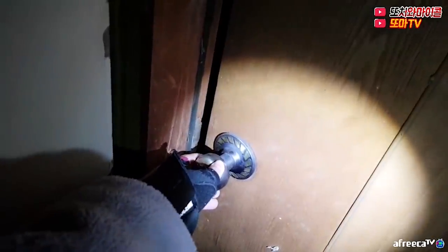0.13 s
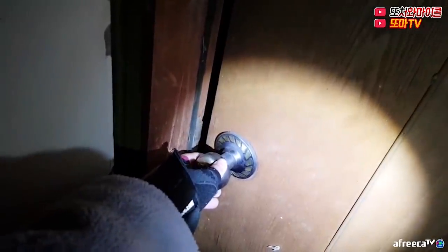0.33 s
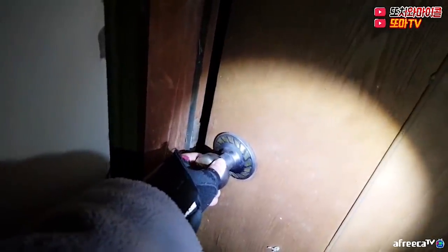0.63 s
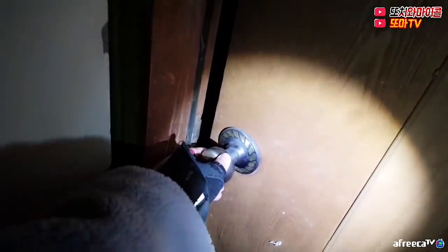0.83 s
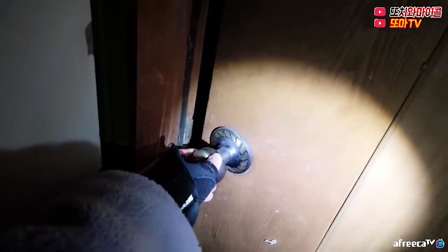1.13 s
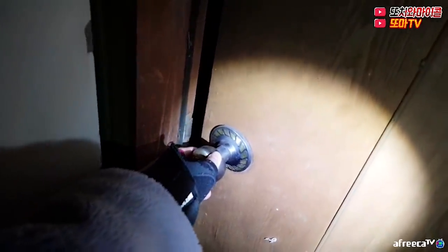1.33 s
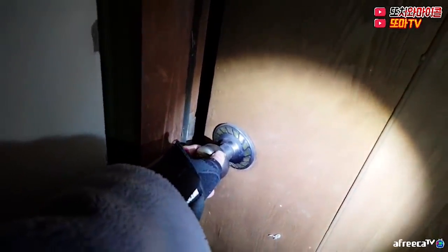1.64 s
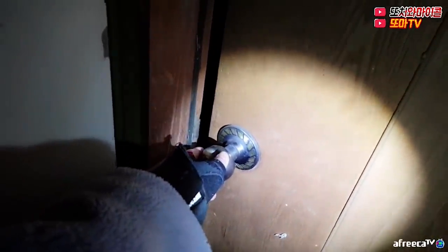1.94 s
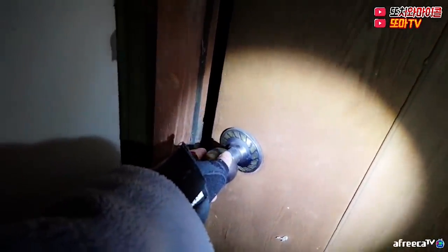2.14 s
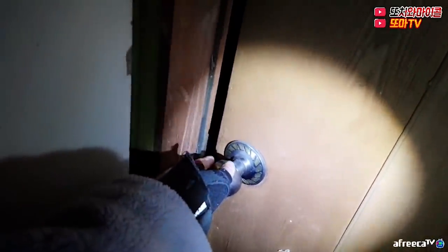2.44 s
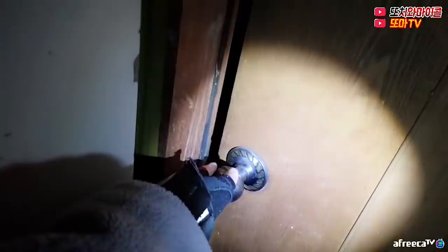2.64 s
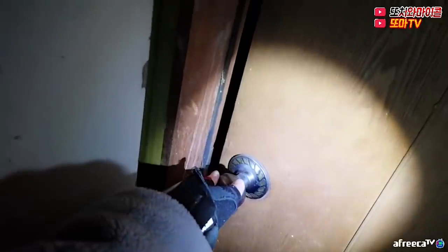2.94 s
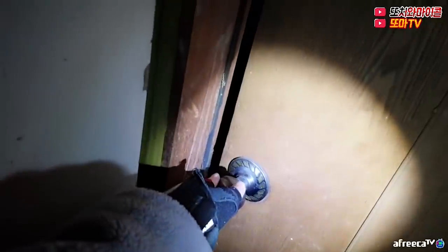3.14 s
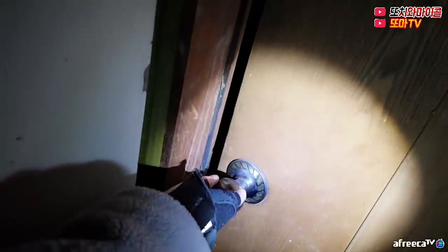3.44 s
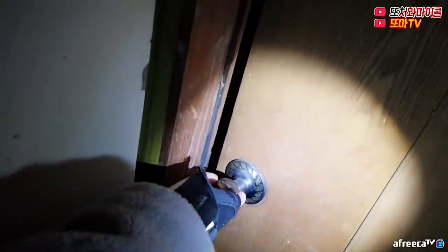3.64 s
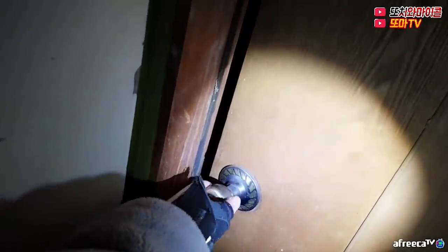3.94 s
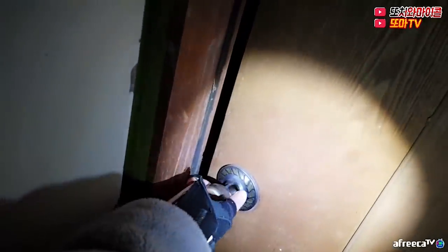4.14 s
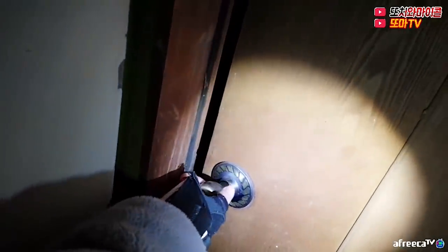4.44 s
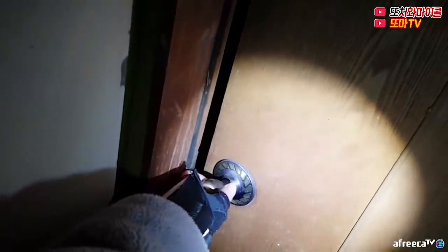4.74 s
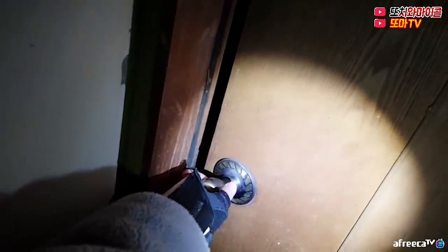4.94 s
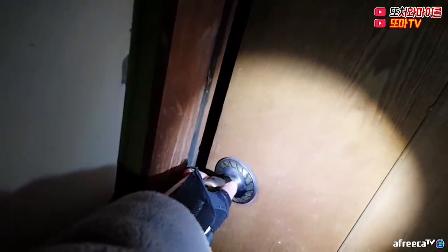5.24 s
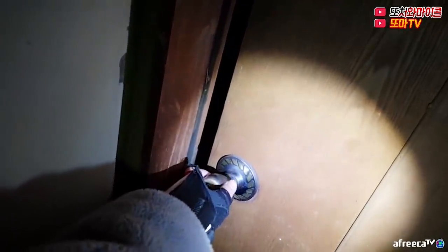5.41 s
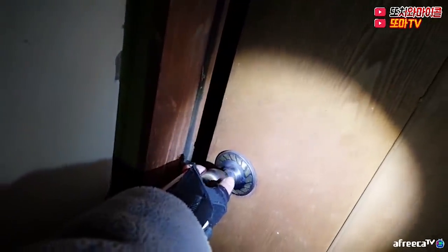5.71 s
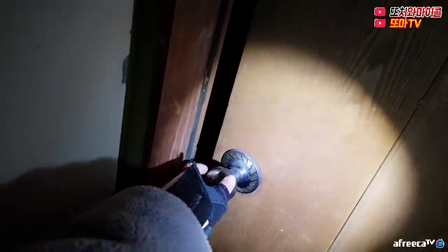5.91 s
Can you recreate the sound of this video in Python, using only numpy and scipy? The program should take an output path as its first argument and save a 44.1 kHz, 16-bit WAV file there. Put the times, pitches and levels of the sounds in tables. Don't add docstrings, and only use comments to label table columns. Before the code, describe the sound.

A gloved hand shakes a loose metal doorknob; sharp latch clacks and deep door thuds burst early, then sparse clicks and faint rubbing.

```python
import sys
import numpy as np
from scipy import signal
from scipy.fft import rfft, irfft, next_fast_len
from scipy.io import wavfile

SR = 44100
rng = np.random.default_rng(int(sys.argv[2]) if len(sys.argv) > 2 else 0)


def how_loud(loudness_db):
    steps = np.asarray(loudness_db, float) / 20
    return 10 ** steps


def materialize(psi):
    bounded = np.clip(np.atleast_2d(psi).T, -1, 1)
    quanta = np.round(bounded * 32767).astype(np.int16)
    wavfile.write(sys.argv[1], SR, quanta)


N = 267586

# (f/Hz, width/Hz, level/dB)
KNOB_BODY = [(529, 600, -19), (838, 42, 5), (1231.5, 18, -8), (1557, 21, 1), (1710, 170, -8.5),
             (2050, 26, -4), (2291, 46, -11), (3012, 73, 8), (3590, 300, -4.5), (3813, 146, 8.5),
             (4140, 850, -4.5), (4680, 116, -3.5), (5750, 170, -1), (7040, 630, 6.5)]
# (f/Hz, level/dB, t60/s)
DOOR_MODES = [(95.4, -4.5, 0.27), (132, 0.5, 0.15), (159.3, 2, 0.35), (204.6, 2, 0.074),
              (241.8, -9.5, 0.66), (272.3, 2, 0.087), (335, -2.5, 0.46), (354, 11, 0.029),
              (428.6, -2, 0.64), (453, -6, 0.52), (513, -21, 0.13)]


def rms_one(x):
    return x / np.sqrt(np.mean(x ** 2) + 1e-20)


def at_hz(points, hz):
    f, value = np.array(points)[:, :2].T
    return np.interp(np.log(hz), np.log(f), value)


def band(x, low_hz, high_hz):
    return signal.sosfilt(signal.butter(2, [low_hz, high_hz], "band", fs=SR, output="sos"), x)


def ring(x, hz, t60):
    r, w = how_loud(-60 / (t60 * SR)), 2 * np.pi * hz / SR
    return signal.lfilter([0, np.sin(w)], [1, -2 * r * np.cos(w), r * r], x + 1e-18)


def resonance(x, hz, width):
    r, w = np.exp(-np.pi * width / SR), 2 * np.pi * hz / SR
    return signal.lfilter([(1 - r * r) / 2, 0, (r * r - 1) / 2], [1, -2 * r * np.cos(w), r * r], x)


def through(x, peaks):
    return sum(how_loud(db) * resonance(x, hz, width) * (-1) ** k for k, (hz, width, db) in enumerate(peaks))


def chatter(t, t60, noise, rise):
    bounces = np.sign(noise) * np.abs(noise) ** 1.77
    return bounces * (1 - np.exp(-t / rise)) * how_loud(-60 * t / np.clip(t60, 0.004, 0.4))


def grains(per_s, spread_db):
    sizes = how_loud(spread_db * np.minimum(rng.exponential(1, N), 4)) * rng.choice([-1, 1], N)
    return sizes * (rng.random(N) < per_s / SR)


def swells(rows, rise_db_per_s, fall_db_per_s, rest_db, column):
    t, level = np.arange(0, N + 64, 64) / SR, rest_db
    for row in rows:
        start, end = row[0], row[0] + row[1]
        rise = rise_db_per_s * np.maximum(start - t, 0)
        fall = fall_db_per_s * np.maximum(t - end, 0)
        level = np.maximum(level, row[column] - rise - fall)
    return np.interp(np.arange(N) / SR, t, level)


def add(out, s, sound):
    at = int(s * SR)
    out[at:at + len(sound)] += sound[:N - at]


def floor():
    # (f/Hz, level/dB)
    spectrum = [(15, -42), (25, -10.5), (55, 2), (72, -2.5), (114, -13), (147, -11.5), (269, -34.5),
                (329, -50.5), (393, -33), (435, -63.5), (860, -50), (2300, -48.5), (5720, -32),
                (10500, -38), (13600, -74), (22000, -120)]
    hz = np.maximum(np.fft.rfftfreq(N, 1 / SR), 1)
    shaped = irfft(rfft(rng.standard_normal(N)) * how_loud(at_hz(spectrum, hz)), N)
    return how_loud(-57.5) * rms_one(shaped)


def leaf():
    # (t/s, hold/s, shudder level/dB, groan level/dB)
    jolts = [(0.0, 0.028, -51, -67.5), (0.2, 0.086, -51, -73), (0.5, 0.0174, -50, -72),
             (0.59, 0.011, -49.5, -33.5), (0.64, 0.015, -28, -31), (0.73, 0.0087, -40, -29),
             (0.79, 0.088, -25, -42.5), (0.94, 0.015, -24.5, -41.5), (1.06, 0.02, -36.5, -61.5),
             (1.14, 0.11, -47, -61), (1.3, 0.33, -49.5, -63.5), (1.77, 0.049, -43.5, -40.5),
             (1.92, 0.032, -47.5, -61), (2.25, 0.02, -49, -70), (2.47, 0.073, -53, -63),
             (2.9, 0.025, -51, -70), (3.08, 0.0137, -48.5, -68), (3.19, 0.016, -46.5, -76),
             (3.38, 0.0105, -58, -57), (3.58, 0.023, -41, -63), (3.64, 0.104, -45, -81.5),
             (3.95, 0.025, -52, -64.5), (4.15, 0.051, -51.5, -68), (4.68, 0.25, -52, -70),
             (5.16, .12, -46.5, -51), (5.34, 0.0085, -41, -50.5), (5.54, 0.005, -44, -55),
             (5.74, 0.014, -41.5, -49), (6.0, 0.0082, -43, -63)]
    # (f/Hz, width/Hz, level/dB)
    rock_modes = [(40.12, 7.9, 0.5), (52.7, 16.9, -2)]
    shudder_db = swells(jolts, 408, 180, rest_db=-59.5, column=2)
    groan_db = swells(jolts, 408, 126.5, rest_db=-72, column=3)
    rock_noise, groan_noise = rng.standard_normal((2, N))
    rock = 0
    for hz, width, db in rock_modes:
        rock = rock + how_loud(db) * rms_one(resonance(resonance(rock_noise, hz, width), hz, width))
    envelope = np.abs(signal.hilbert(rock, next_fast_len(N))[:N])
    rock = rock / (envelope + 0.14) ** 0.4
    groan = sum(how_loud(db) * ring(groan_noise, hz, 0.049) for hz, db, _ in DOOR_MODES[:6])
    return how_loud(shudder_db) * rms_one(rock) + how_loud(groan_db) * rms_one(groan)


def rub():
    # (t/s, hold/s, dull level/dB, bright level/dB)
    strokes = [(0.36, 0.21, -73, -72), (0.56, .05, -65, -76), (0.83, 0.024, -60.5, -64.5),
               (1.0, 0.16, -69, -68.5), (1.4, 0.261, -70.5, -68.5), (1.8, 0.107, -67, -65.5),
               (1.95, 0.28, -65.5, -67), (2.45, 0.25, -75.5, -68.5), (3.42, 0.34, -73, -68.5),
               (3.75, 0.024, -70, -64.5), (3.87, 0.34, -70, -66.5), (5.15, 0.049, -66, -65.5),
               (5.27, 0.1, -64.5, -61.5), (5.45, 0.14, -70, -67.5), (5.78, 0.087, -73.5, -64),
               (5.99, .08, -75.5, -63.5)]
    # (f/Hz, width/Hz, level/dB)
    rub_peaks = [(438, 320, 2), (900, 360, 4.5), (1342, 370, 3.5), (2550, 1700, 0.5), (4270, 1704, 7.5),
                 (5294, 2800, 8), (7540, 5300, 3)]
    dull_db = swells(strokes, 125, 53, rest_db=-78, column=2)
    bright_db = swells(strokes, 125, 53, rest_db=-73, column=3)
    friction = grains(1500, spread_db=2.0) + 0.249 * rng.standard_normal(N)
    peaks = []
    for k, (hz, width, db) in enumerate(rub_peaks):
        peaks.append(how_loud(db) * rms_one(resonance(friction, hz, width)) * (-1) ** k)
    dull, bright = sum(peaks[:3]), band(sum(peaks[3:]), 1870, 9000)
    return how_loud(dull_db) * rms_one(dull) + how_loud(bright_db) * rms_one(bright)


def scuffs():
    # (t of the top/s, level/dB, centre f/Hz, half length/s)
    strokes_on_wood = [(0.37, -68.5, 560, 0.041), (1.571, -65, 850, 0.043), (1.98, -52.5, 920, 0.0042),
                       (3.378, -65, 1200, 0.015), (2.613, -61.5, 880, 0.03), (5.752, -58.5, 770, 0.029),
                       (5.826, -72, 3060, 0.0195), (6.047, -60.5, 7200, 0.012), (2.3, -66, 5500, .004),
                       (1.737, -65, 6600, .005), (5.345, -66, 2800, .004), (6.1, -66, 3300, .012),
                       (5.67, -68, 4200, 0.023), (0.536, -64, 4400, .004)]
    t, friction = np.arange(N) / SR, grains(4000, spread_db=-0.5)
    out = np.zeros(N)
    for s, db, hz, half in strokes_on_wood:
        swell = np.exp(-((t - s) / half) ** 2)
        out += how_loud(db) * swell * rms_one(band(friction, hz / 1.335, hz * 1.31))
    return out


def door():
    # (t/s, panel peak level/dB, deep level/dB, rail level/dB, ring as share of full t60)
    thuds = [(0.559, -28, -28.5, -33.5, 0.2), (0.591, -26.5, -20.5, -32.5, 0.63),
             (0.628, -19, -24, -34, 0.56), (0.701, -19.5, -42, -24, 0.55), (0.8, -33, -44, -35.5, 0.46),
             (0.957, -36, -22.5, -39, 0.42), (0.973, -32, -36, -39, 0.34), (1.361, -36.5, -44, -44.5, 0.47),
             (1.7548, -22.5, -31.5, -37, 0.51), (2.138, -63, -54, -47.5, 0.256), (2.52, -49, -59.5, -57, 1),
             (3.338, -44, -57, -61.5, 0.58), (3.518, -50, -42.5, -84, 0.93), (3.54, -47.5, -41, -70, 0.97),
             (3.824, -47, -52, -58.5, 1), (4.454, -43.5, -50, -54, 0.25), (5.198, -43.5, -51, -64, 0.62),
             (5.26, -67, -63, -53, 1), (5.75, -63.5, -45, -53.5, 0.44)]
    out, t = np.zeros(N), np.arange(SR // 2) / SR
    push = t * np.exp(-t / 0.0004)
    push = push / push.sum()
    for s, panel_db, deep_db, rail_db, share in thuds:
        levels = [deep_db + 0.5] * 2 + [panel_db - 7.0] * 5 + [rail_db] * 4
        for k, ((hz, mode_db, t60), blow_db) in enumerate(zip(DOOR_MODES, levels)):
            luck_db = 2.0 * rng.normal()
            mode = ring(push, hz, t60 * share)
            add(out, s, how_loud(blow_db + mode_db + luck_db) * (-1) ** k * mode)
    return out


def clicks():
    # (t/s, latch peak level/dB, wood over latch level/dB, chatter t60/s, hardness/dB)
    slams = [(0.5898, -17.5, -5, 0.018, 0), (0.5964, -30.5, 2, 0.018, 4), (0.6563, -27, -2.5, 0.027, 0),
             (0.8804, -46, -0.5, 0.067, -11), (4.6547, -63.5, 5.5, 0.08, -13),
             (5.1674, -43, -2.5, 0.022, -6), (5.4248, -50.5, -5, 0.03, -1)]
    latches = [(0.5612, -37.5, -5, 0.025, 7), (0.7008, -26.5, 0.5, 0.048, 13.5),
               (0.7514, -35.5, -5.5, 0.053, -0.5), (0.7934, -32.5, -2, 0.052, 2),
               (1.3744, -37.5, -2, 0.045, -7), (1.749, -40, 2.5, 0.09, 0.5),
               (2.522, -35.5, -9.5, 0.049, 0.5)]
    knocks = [(0.7108, -31, -12, 0.021, -10), (0.9556, -22.5, -6, 0.036, 3),
              (0.9716, -21, -9.5, 0.029, 2.5), (1.3602, -27.5, -13.5, 0.044, -6),
              (1.7644, -37.5, 6, 0.014, 7), (1.975, -50.5, -27, 0.034, 8.5), (4.453, -45.5, -1.5, 0.062, 3),
              (5.1993, -28.5, -9, 0.031, -5), (5.2408, -41.5, -1, 0.046, -4)]
    ticks = [(1.3004, -57.5, -4.5, 0.081, 1), (2.6756, -47.5, -13, 0.041, -9),
             (2.848, -52.5, -30, 0.094, -7.33), (3.1057, -52.5, -11, 0.088, -4),
             (3.3694, -49.5, -8, 0.022, -4), (3.825, -53, -12, 0.071, -14), (4.004, -59, -20, 0.085, -6),
             (4.1955, -62, -7, 0.069, -3), (5.41, -51, -3.5, 0.032, -10)]
    # (metal over latch level/dB, bright over latch level/dB)
    kinds = [
        (-2.5, -11.5),
        (-6.5, -42),
        (-20.5, -26.5),
        (3, 0),
    ]
    # (t/s, latch level/dB, wood level/dB, metal level/dB, bright level/dB, t60/s)
    finger_tick = (6.0025, -60, -63.5, -44, -41.5, 0.04)
    # (low f/Hz, high f/Hz, crest level/dB, t60 factor)
    parts = [
        (432, 1097, -0.5, 3.1),
        (1240, 3240, -0.5, 0.95),
        (2816, 4940, 4, 0.78),
        (5100, 10280, 4, 1.15),
    ]

    contacts = [finger_tick]
    for rows, (metal, bright) in zip((slams, latches, knocks, ticks), kinds):
        for s, db, wood, t60, hard in rows:
            contacts.append((s, db, db + wood, db + metal + 0.4 * hard, db + bright + hard, t60))
    out, t = np.zeros(N), np.arange(SR // 6) / SR
    for s, latch_db, wood_db, metal_db, bright_db, t60 in contacts:
        noise = rng.standard_normal(len(t))
        snap = how_loud(-2.5) * chatter(t, 0.0032, noise, rise=0.000222)
        for db, (low_hz, high_hz, crest_db, factor) in zip((wood_db, latch_db, metal_db, bright_db), parts):
            burst = chatter(t, t60 * factor, noise, rise=0.00085) + snap
            body = burst + how_loud(3.5) * through(burst, KNOB_BODY)
            part = band(band(body, low_hz, high_hz), low_hz * 0.8, high_hz * 1.3)
            add(out, s, how_loud(db + crest_db) * part / np.abs(part).max())
    return out


def spots():
    # (t/s, peak level/dB, f/Hz, width/Hz, t60/s)
    struck = [(.5615, -35, 3600, 900, 0.039), (.5905, -20.5, 3600, 1200, .015),
              (.5905, -26.5, 8000, 2500, 0.011), (.6575, -29.5, 6300, 1500, .025),
              (0.7014, -24.5, 3240, 900, 0.043), (.794, -43, 5230, 900, 0.036),
              (.9575, -26.5, 1750, 400, 0.033), (.9575, -36, 5700, 900, 0.023),
              (.9745, -27.5, 2090, 600, 0.033), (.975, -38, 8500, 2000, 0.023),
              (1.3765, -36, 2600, 1500, .015), (1.424, -56, 1410, 200, .03), (2.677, -48, 5500, 900, .025),
              (3.106, -47.5, 5470, 1000, .025), (3.37, -49, 5840, 900, 0.028),
              (3.8255, -56, 2500, 2500, 0.012), (5.2418, -37.5, 2400, 2000, .012),
              (6.0035, -38, 3000, 1400, 0.015), (6.0023, -35, 5000, 1800, .014),
              (6.003, -35, 8200, 3000, .014), (6.0095, -47, 6000, 4000, .012), (.61, -40, 1850, 500, .1),
              (.636, -33, 1880, 300, 0.087), (.962, -33, 3050, 200, .04), (.983, -33, 1550, 300, 0.055),
              (0.7983, -39, 2900, 1500, .04), (1.012, -42, 1900, 1210, .07), (1.036, -41, 900, 900, .06),
              (.563, -43, 1300, 500, .03), (5.1672, -42, 1700, 1400, .015), (5.2002, -34.5, 1700, 300, .03),
              (5.2418, -45, 3300, 1500, .012), (1.3604, -36, 1760, 300, .03), (1.365, -40, 3050, 300, .03),
              (1.3765, -42, 4200, 900, .012), (1.976, -49, 1250, 597, .02), (3.371, -50, 4400, 700, .03),
              (3.372, -58, 1400, 700, .03), (2.849, -49, 4630, 900, .05)]
    # (t/s, peak level/dB, f/Hz, width/Hz, t60/s)
    further_spots = [(1.256, -61, 1580, 250, .04), (.592, -30, 630, 300, .06), (.976, -35, 580, 250, .06),
                     (.6357, -32, 2500, 3000, .012), (.7509, -41, 3000, 3000, .012), (.615, -36, 2400, 2500, .01),
                     (.718, -38, 3000, 1500, .012), (2.5215, -46, 4180, 250, .035),
                     (5.2415, -39.5, 2900, 2200, 0.0092), (3.825, -58, 1800, 2500, .012),
                     (2.86, -58, 4460, 500, 0.11), (3.8, -55, 4300, 900, .1), (.8, -42, 1040, 900, 0.089),
                     (.885, -48, 1200, 900, .08), (1.385, -47, 843, 120, 0.09), (1.05, -53.5, 3060, 150, .15)]
    out, t = np.zeros(N), np.arange(SR // 20) / SR
    for s, db, hz, width, t60 in struck + further_spots:
        burst = chatter(t, t60, rng.standard_normal(len(t)), rise=0.00036)
        burst = resonance(resonance(burst, hz, width), hz, width)
        add(out, s, how_loud(db) * burst / np.abs(burst).max())
    return out


def snaps():
    # (t/s, peak level/dB, lowest radiated f/Hz)
    impulses = [(0.591, -21, 2480), (0.6572, -32, 2500), (0.702, -30, 1500), (0.7031, -34, 1101),
                (0.9572, -36, 1500), (1.377, -39, 800), (5.242, -43, 900), (6.0035, -29.5, 2594)]
    out = np.zeros(N)
    for s, db, low_hz in impulses:
        click = np.arange(400) == 0
        pulse = band(band(click, low_hz, low_hz * 4), low_hz * 0.85, 12000)
        add(out, s, -how_loud(db) * pulse / np.abs(pulse).max())
    return out


def knob():
    # (t/s, shell level/dB, case level/dB, plate level/dB, ring as share of full t60)
    pings = [(0.592, -60, -34, -46, 0.37), (.636, -60, -38.5, -37, 0.49), (0.701, -60, -44, -50, 0.4),
             (0.9572, -49, -37, -37, 0.36), (0.974, -62, -35, -31, 0.6), (1.004, -55.5, -57, -51, 1.8),
             (1.361, -54, -37, -44, 0.28), (1.3756, -61, -58, -48, 1.3), (1.3765, -70, -44, -40, .4),
             (2.5215, -53, -48, -52, 0.33), (2.611, -70, -59, -53, 0.55), (2.85, -69, -72, -75, .3),
             (3.37, -64, -70, -70, 0.29), (5.2002, -44.5, -46, -59, 0.45), (5.243, -70, -54, -51, .35)]
    # (f/Hz, level/dB, t60/s)
    shell_modes = [(4181, 0, .5), (4150, -13, .3), (4223, -9, .35), (4081, -12, .2), (4325, -12, .15)]
    case_modes = [(1500, -1, 0.11), (1700, 0, 0.068), (1880, -4.5, 0.11), (2200, -3.5, .09),
                  (2470, -6, 0.081), (3060, -3, 0.094), (3600, -7, 0.049)]
    plate_modes = [(624.4, -10, 0.19), (839, 0, 0.17), (1050, -6, 0.12), (1171, -11, .1)]
    grips = [0.7, 0.9, 1.088, 1.47, 2.565, 2.87, 3.385, 5.246, 6.0]
    out, t = np.zeros(N), np.arange(SR // 2) / SR
    for s, shell_db, case_db, plate_db, share in pings:
        modes = np.zeros(len(t))
        for db, body in ((shell_db, shell_modes), (case_db, case_modes), (plate_db, plate_modes)):
            for hz, mode_db, t60 in body:
                modes += how_loud(db + mode_db - 60 * t / (t60 * share)) * np.sin(2 * np.pi * hz * t)
        grip = min(g for g in grips if g > s)
        held = how_loud(-8 * np.clip((t + s - grip) / 0.025, 0, 1))
        onset = 1 - np.exp(-t / 0.00094)
        add(out, s, onset * held * modes)
    return out


def rattle():
    # (t/s, hold/s, dull level/dB, bright level/dB)
    bouts = [(.6, .01, -65, -73), (.632, 0.022, -41, -45), (.66, 0.0034, -43, -42), (.68, .01, -53, -53),
             (.72, 0.016, -48.5, -59), (.77, .01, -53.5, -72), (.81, .005, -55.5, -71), (.9, .01, -66, -72)]
    dull_db = swells(bouts, 703, 347, rest_db=-120, column=2)
    bright_db = swells(bouts, 703, 347, rest_db=-120, column=3)
    hits = grains(2000, spread_db=3.0)
    body = hits + how_loud(3) * through(hits, KNOB_BODY)
    dull, bright = band(body, 410, 3130), band(body, 2000, 7500)
    return how_loud(dull_db) * rms_one(dull) + how_loud(bright_db) * rms_one(bright)


def kicks():
    # (t/s, level/dB, f/Hz, t60/s)
    bumps = [(3.516, -35, 47, 0.3), (3.538, -32, 47, .25), (3.532, -40.5, 205, 0.23),
             (5.69, -46.5, 160, 0.16), (1.097, -36, 41.5, 0.9), (1.029, -28.5, 42.5, 0.56),
             (.982, -20, 45, .25), (.624, -16.5, 58, .12), (.643, -13, 40, 0.26), (3.545, -40, 180, 0.22),
             (1.192, -36, 43, 0.47), (.96, -34, 436, .16), (.707, -20, 287, 0.072), (2.1, -44, 150, 0.09),
             (1.772, -22.5, 293, 0.072), (1.794, -35, 167, .3)]
    out, t = np.zeros(N), np.arange(SR // 2) / SR
    for s, db, hz, t60 in bumps:
        onset = 1 - np.exp(-t / 0.005)
        add(out, s, -how_loud(db - 60 * t / t60) * onset * np.sin(2 * np.pi * hz * t))
    return out


def spring():
    # (t/s, peak level/dB, coil over body level/dB)
    turn_slips = [(2.072, -54.5, -2), (2.083, -57, -6), (2.094, -55, -6), (2.103, -51, -10),
                  (2.122, -54, -8), (2.137, -49.5, -10), (2.1616, -52.5, -2), (2.178, -51.5, -1),
                  (2.194, -51, 0.1), (2.213, -50, -2)]
    # (t/s, peak level/dB, coil over body level/dB)
    return_slips = [(2.4763, -52, 8), (2.4955, -52.5, 5), (2.512, -50, -1), (2.534, -53, 2),
                    (2.551, -52, 7), (2.5708, -52, 5), (2.5887, -49.5, 3), (2.609, -47.5, -1)]
    # (f/Hz, width/Hz, level/dB)
    spring_body = [(1360, 170, 4.5), (2461, 270, 2.5), (3520, 1100, -2.5), (4200, 380, 0), (5140, 710, -3),
                   (6120, 1800, -6.5), (7500, 810, -12.5)]
    out, t = np.zeros(N), np.arange(SR // 20) / SR
    for s, db, coil_db in turn_slips + return_slips:
        slip = how_loud(db + 8.0) * chatter(t, 0.028, rng.standard_normal(len(t)), rise=0.00093)
        coil = resonance(slip, 5400, 410)
        add(out, s, through(slip, spring_body) + how_loud(coil_db) * coil)
    return out


def room(x):
    # (f/Hz, t60/s)
    reverb_times = [(150, 0.76), (500, 0.35), (1500, 0.44), (4000, 0.2), (9000, 0.1)]
    t = np.arange(SR // 2) / SR
    tail = np.zeros(len(t))
    for hz in 80 * 2.0 ** np.arange(8):
        octave = band(rng.standard_normal(len(t)), hz / 1.4, hz * 1.4)
        tail += octave * how_loud(-60 * t / at_hz(reverb_times, hz))
    tail = tail * np.clip(t / 0.0056, 0, 1)
    return signal.fftconvolve(x, tail / np.sqrt(np.sum(tail ** 2)))[:N]


def scene():
    near = clicks() + knob() + spring() + door() + rattle() + snaps()
    reverb = how_loud(-12.5) * room(near)
    mix = near + reverb + leaf() + kicks() + rub() + scuffs() + floor() + spots()
    return mix[None]


def top_cut(x):
    return signal.sosfilt(signal.butter(12, 10770, fs=SR, output="sos"), x)


def record(dry):
    cut = signal.sosfilt(signal.cheby2(12, 60, 11390, fs=SR, output="sos"), dry)
    return top_cut(cut)


dry = scene()
out = record(dry)
materialize(out)
```